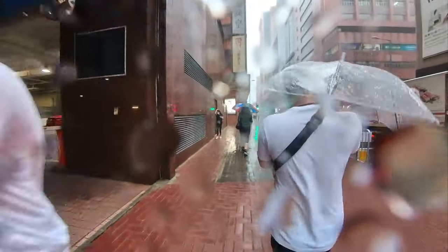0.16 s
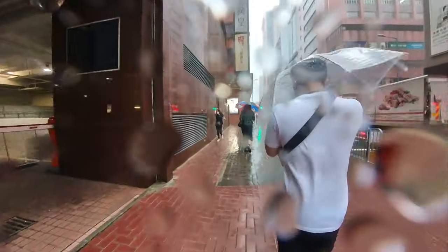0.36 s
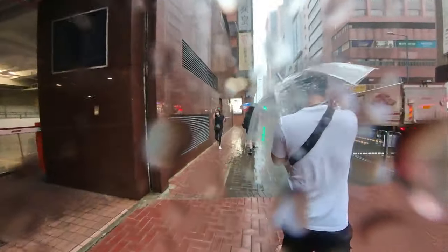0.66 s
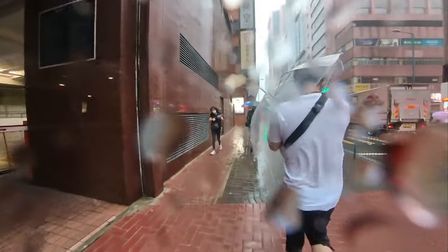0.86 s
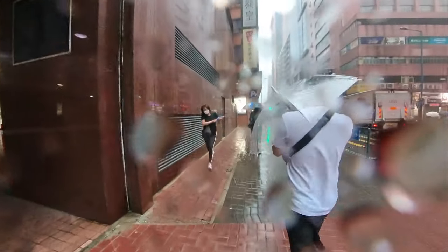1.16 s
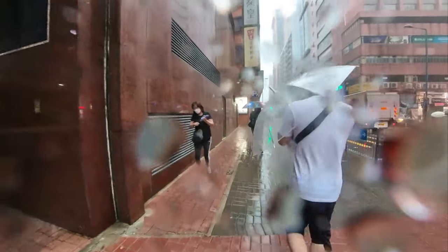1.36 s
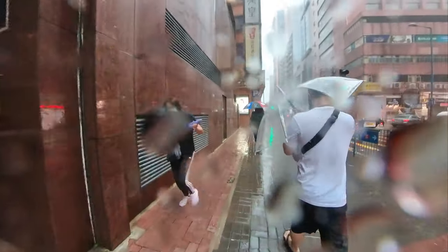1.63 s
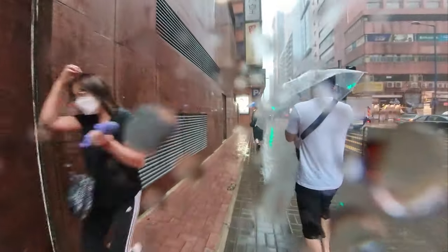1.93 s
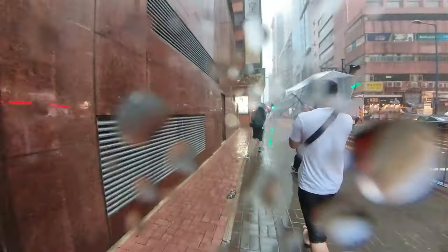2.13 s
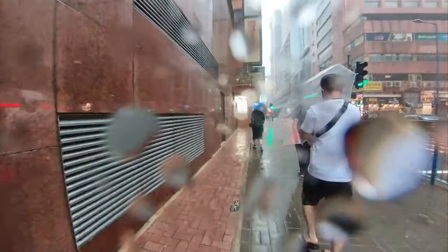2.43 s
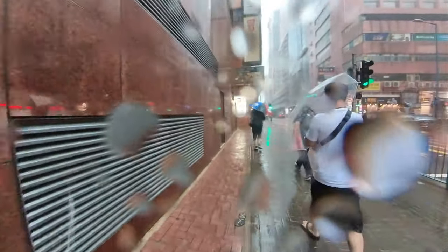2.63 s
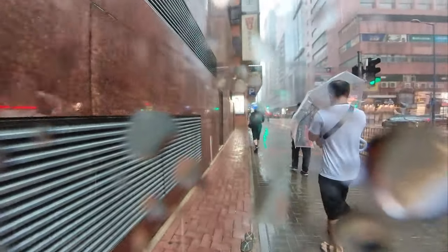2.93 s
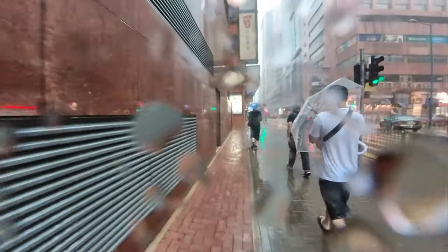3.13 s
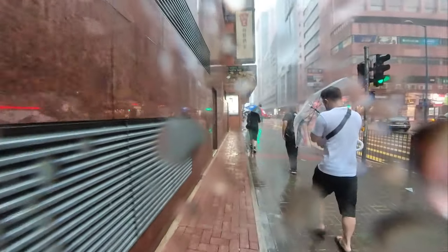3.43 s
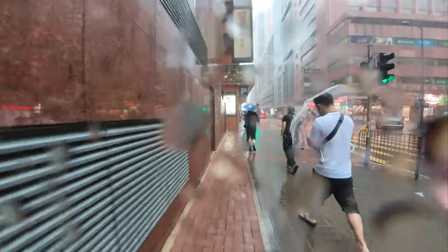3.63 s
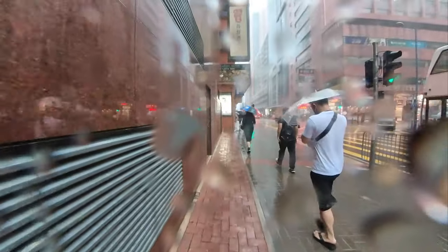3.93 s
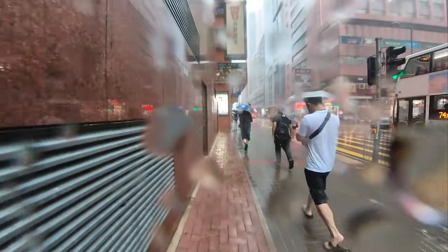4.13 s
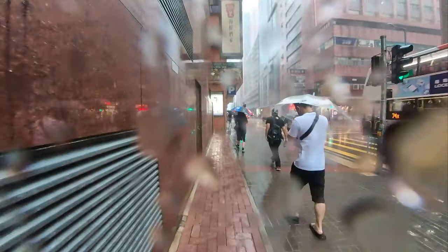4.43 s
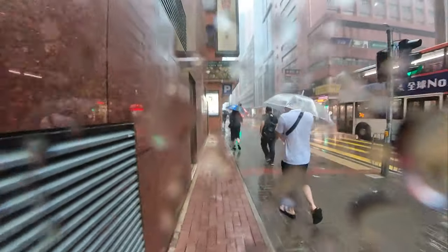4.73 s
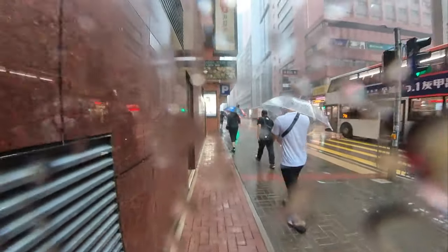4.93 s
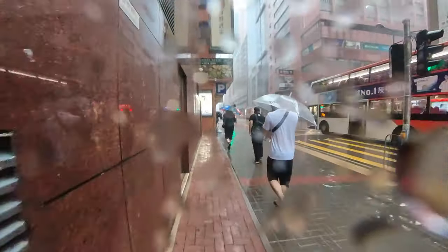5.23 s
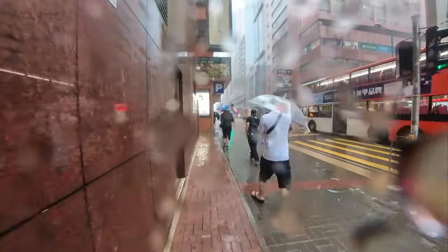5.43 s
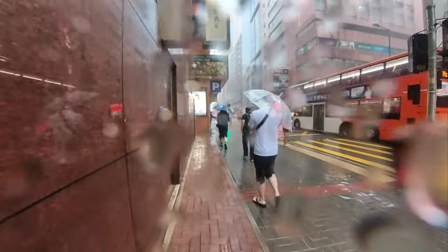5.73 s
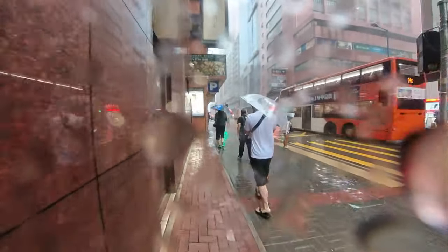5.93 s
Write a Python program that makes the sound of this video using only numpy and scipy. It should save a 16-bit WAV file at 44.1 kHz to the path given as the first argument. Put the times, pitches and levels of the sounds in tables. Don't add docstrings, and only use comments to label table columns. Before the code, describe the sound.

From 0 to about 2 seconds, rain on a covered passage roof makes a dull, hollow, surging roar, strongest near 0.8, fading as the walker leaves. Steady rain hiss lies over it, gently wide, its treble muffled by a wet sealed housing and slowly pressed down by noise suppression. Deep short pole thumps come at 0.6, 1.7, 2.0 and 2.5; drops tap the shell at 1.1 and 1.9, with a little watery rattle. At 2.76 a hard drop cracks sharply, with a knock and brief fizzing spray, then low sways and wind lumps around 2.9 to 3.3. Thuds and hollow mount knocks cluster at 3.2, 4.3 and 4.9, with the strongest knock at 5.43. A faint tick and spray come at 5.9, and a last bass thump at 6. Distant traffic rumbles softly throughout.

```python
import sys
import numpy as np
from scipy import signal
from scipy.fft import rfft, irfft, next_fast_len
from scipy.io import wavfile
from scipy.ndimage import uniform_filter1d

SR = 44100
rng = np.random.default_rng(int(sys.argv[2]) if len(sys.argv) > 2 else 0)


def field_ratio(decibels):
    return 10 ** (np.asarray(decibels, dtype=float) / 20)


def generate_wav(signal):
    frames = np.transpose(np.atleast_2d(signal))
    scaled = np.clip(frames, -1, 1) * 32767
    pcm = np.round(scaled).astype(np.int16)
    wavfile.write(sys.argv[1], SR, pcm)


N = 268172


def rms_one(x):
    return x / np.sqrt(np.mean(x ** 2) + 1e-20)


def drift(rate_hz):
    r = np.exp(-80 * np.pi * rate_hz / SR)
    noise = rng.standard_normal(N // 40 + 2002)
    slow = signal.lfilter([1], [1, -2 * r, r * r], noise)[2000:]
    return np.interp(np.arange(N) / 40, np.arange(len(slow)), rms_one(slow))


def bumps(rows):
    t = np.arange(N) / SR
    return sum(db * np.exp(-((t - s) / length) ** 2) for s, db, length in rows)


def coloured(x, points, low_hz, high_hz):
    size = next_fast_len(N)
    hz = np.maximum(np.arange(size // 2 + 1) * SR / size, 1)
    point_hz, point_db = np.array(points).T
    gain = field_ratio(np.interp(np.log(hz), np.log(point_hz), point_db))
    inside = (hz >= low_hz) * (hz < high_hz)
    return irfft(rfft(x, size) * gain * inside, size)[..., :N]


def band_of(x, low_hz, high_hz):
    return coloured(x, [(1, 0), (SR, 0)], low_hz, high_hz)


def ring(clicks, hz, t60_s):
    r = field_ratio(-60 / (t60_s * SR))
    w = 2 * np.pi * hz / SR
    return signal.lfilter([0, np.sin(w)], [1, -2 * r * np.cos(w), r * r], clicks + 1e-18)


def split(rows, rise_share):
    return [(s, db, hz, ms * rise_share, ms * (1 - rise_share)) for s, db, hz, ms in rows]


def swings(rows, sag, rough):
    out = np.zeros(N)
    flutter = np.array([drift(120.0), drift(240.0)])
    for s, db, hz, rise_ms, fall_ms in rows:
        first = max(round((s - rise_ms / 200) * SR), 0)
        last = min(round((s + fall_ms / 200) * SR), N)
        at = np.arange(first, last)
        t = at / SR - s
        age = 1000 * t / np.where(t < 0, rise_ms, fall_ms)
        turn = 2 * np.pi * hz * t * (1 - sag * np.tanh(age / 1.3))
        swing = (1 - rough + rough * flutter[0, at]) * np.sin(turn)
        swing += rough * flutter[1, at] * np.cos(turn)
        out[at] += field_ratio(db) * .5 ** (np.abs(age) ** 1.66) * swing
    return out


# pitch_hz, level_db (per Hz)
STREET_COLOUR = [(12, -33), (20, 3), (56, -1.5), (74, -0.5), (101, -9.5), (140, -11), (272, -12.5),
                 (315, -13.5), (357, -17.5), (390, -17), (682, -23), (1480, -32.5), (1920, -56.5),
                 (3260, -120)]
# peak_s, rise_db, length_s
GUST_TIMES = [(0.0, 4, 0.13), (.9, 3, 0.27), (2.2, 6, .08), (2.88, 12.5, 0.1), (3.277, 12, .13),
              (4.62, 4, 0.14), (5.06, 7, .1), (5.32, 4, 0.054), (5.85, 3.5, 0.37)]


def street():
    traffic_noise, wind_noise = rng.standard_normal((2, N))
    wind_db = -55 + bumps(GUST_TIMES) + 1.7 * drift(13.0)
    traffic_db = -57 + 0.67 * drift(5.3)
    wind = field_ratio(wind_db) * rms_one(coloured(wind_noise, STREET_COLOUR, 22, 130))
    traffic = field_ratio(traffic_db) * rms_one(coloured(traffic_noise, STREET_COLOUR, 120, 1500))
    return wind + traffic


# pitch_hz, level_db (per Hz)
HOLLOW_COLOUR = [(235, -18.5), (270, -7), (310, 5), (360, -0.5), (420, -2), (475, -9), (530, -16.5),
                 (600, -12.5)]
# peak_s, rise_db, length_s
ROOF_SURGES = [(.38, 2.5, 0.086), (.8, 6.5, 0.11), (1.15, 4.5, 0.036), (1.32, 2.5, 0.082), (1.53, 4, 0.033),
               (1.69, 5, 0.04), (1.85, 4.5, .04)]
# peak_s, rise_db, length_s
ROAR_SWELLS = [(.45, 5, 0.24), (.9, 5, 0.13), (1.25, 4.5, .12)]


def passage():
    t = np.arange(N) / SR
    fade_db = 9 * t
    low_db = -45.5 - fade_db + bumps(ROOF_SURGES) + 1.1 * drift(5.2)
    upper_db = -62.5 - 0.9 * fade_db + bumps(ROAR_SWELLS) + 1.6 * drift(3.9)
    gone_db = -20.0 * np.maximum(t - 2, 0)
    white = rng.standard_normal(N)
    low = field_ratio(low_db) * rms_one(coloured(white, HOLLOW_COLOUR, 235, 600))
    upper_colour = [(600, -0.5), (680, 0.5), (765, -4.5)]
    upper = field_ratio(upper_db) * rms_one(coloured(white, upper_colour, 600, 765))
    return field_ratio(gone_db) * (low + upper)


# low_hz, high_hz, narrow_share (of frames)
WIDE_BANDS = [(3050, 3400, .06), (3400, 3820, .04), (3820, 4300, .04), (4300, 5000, .04), (5000, 5600, .12),
              (5600, 6200, .4), (6200, 6850, .975), (8300, 9000, .98)]
NARROW_TIMES = [2.765, 5.885]


def width():
    frame = 1024
    out, white, t = 0, rng.standard_normal(N), np.arange(N) / SR
    for low_hz, high_hz, narrow_share in WIDE_BANDS:
        kept = np.repeat(rng.random(N // frame + 2) > narrow_share, frame) * 1.
        smooth = uniform_filter1d(kept, size=256)[:N]
        out = out + band_of(white * smooth, low_hz, high_hz)
    for s in NARROW_TIMES:
        out = out * (1 - np.exp(-((t - s) / .016) ** 4))
    return out


# pitch_hz, level_db (per Hz)
HISS_COLOUR = [(1500, 3), (2400, -2), (3800, -6), (4800, -6), (5500, -4), (6050, -8), (7000, -10.5),
               (7600, -17), (7750, -23), (8400, -30.5), (9000, -30), (9600, -44)]
HISS_EDGES_HZ = [1500, 2410, 3820, 6050, 9600]
# open_db, closes_db, closing_s, abruptness (no unit)
CLOSING = [(-58, 19.5, 6.56, 2.85), (-55.5, 3.5, 4.5, 1), (-60, 13, 1.22, 1.2), (-62, 18, 4.06, 2)]
WAVER_DB = [0.89, 0.87, 1.5, 0.47]
LIFTS = [.05, .05, .3, .1]
# start_s, end_s, rise_db
OPENING = (2.86, 3.05, 3.4)


def rain(grain_db, ragged_db, side_db):
    mid, side, t = rng.standard_normal(N), field_ratio(side_db) * width(), np.arange(N) / SR
    for low_hz in np.arange(7700, 9600, 200):
        patch_db = ragged_db * (low_hz - 7400) / 2000 * drift(18.0)
        mid = mid + (field_ratio(patch_db) - 1) * band_of(mid, low_hz, low_hz + 200)
    left_right = np.array([mid + side, mid - side])
    start_s, end_s, rise_db = OPENING
    opening_db = rise_db * uniform_filter1d(1. * (t > start_s) * (t < end_s), size=1800)
    shared, surge_db, out = drift(1.8), bumps(ROOF_SURGES), 0
    bands = zip(HISS_EDGES_HZ, HISS_EDGES_HZ[1:], CLOSING, WAVER_DB, LIFTS)
    for low_hz, high_hz, closing, waver_db, lift in bands:
        open_db, closes_db, closing_s, abruptness = closing
        closed = 1 - np.exp(-(t / closing_s) ** abruptness)
        level_db = open_db - closes_db * closed + lift * surge_db + opening_db
        level_db += waver_db * (0.66 * shared + drift(15.0))
        level_db += grain_db * (low_hz / 6000) ** 2 * drift(90.0)
        out = out + field_ratio(level_db) * rms_one(coloured(left_right, HISS_COLOUR, low_hz, high_hz))
    return out


# peak_s, level_db, pitch_hz, length_ms (at half height)
SHELL_TAPS = [(.735, -51, 4200, 3.5), (1.085, -39, 1360, 3.2), (1.098, -42, 1325, 5.3),
              (1.108, -49, 1354, 9), (1.095, -36.5, 257, 5), (1.897, -34.5, 513, 6.9),
              (1.895, -54, 1010, 4), (2.342, -52, 1020, 5.6), (2.511, -47, 1250, 3.5),
              (2.692, -39, 300, 3.1), (2.755, -33, 272, 5), (2.757, -43, 575, 2.8),
              (2.7795, -27, 272, 13.5), (2.7641, -27.5, 1040, 2.5), (2.7635, -45, 1800, 1.6),
              (2.78, -40, 553, 11), (2.842, -52, 694, 3.5), (2.778, -37.5, 1150, 4.5), (3.328, -43, 287, 7),
              (3.342, -47, 1045, 5), (3.731, -34.5, 262, 5.2), (4.051, -45.5, 1070, 4.6),
              (5.102, -54.5, 990, 4.8), (5.433, -32, 217, 3.9), (5.85, -52, 1340, 5.3),
              (5.9, -42, 5480, 2.2), (5.899, -41, 2730, 1.4), (5.901, -53.5, 1410, 5.5)]
# peak_s, level_db, pitch_hz, length_ms (at half height)
SHELL_TRICKLES = [(1.1, -51, 1347, 38), (1.135, -63, 1410, 18), (1.925, -47.5, 548, 42),
                  (2.8, -53, 1060, 61), (2.819, -43, 284, 32), (2.805, -67, 633, 40), (3.14, -61, 1050, 16),
                  (4.076, -54, 980, 13), (4.37, -55.5, 1123, 25), (4.405, -57.5, 1036, 26),
                  (5.875, -62, 1227, 57)]


def drops():
    taps = swings(split(SHELL_TAPS, 0.32), sag=.01, rough=0.14)
    trickles = swings(split(SHELL_TRICKLES, 0.55), sag=.0, rough=0.66)
    return taps + trickles


# start_s, level_db, spray_db, spray_length_s
SHARP_DROPS = [
    (0.716, -61, -57, 0.0096),
    (2.509, -50, -53, 0.0053),
    (2.763, -26, -54.5, 0.047),
    (5.898, -61, -64.5, 0.037),
]
# pitch_hz, level_db, t60_s
COVER_TONES = [(1210, 0.5, 0.0042), (2400, -27.5, 0.0031), (5480, -1, 0.0063), (4100, -2.5, 0.0027),
               (6260, -5.5, 0.0044)]
# pitch_hz, level_db (per Hz)
FIZZ_COLOUR = [(900, 3), (3000, -13.5), (6000, -2.5), (8000, -16), (9480, -39)]


def cracks():
    clicks, spray, t = np.zeros(N), np.zeros(N), np.arange(N) / SR
    for s, db, spray_db, length_s in SHARP_DROPS:
        clicks[round(s * SR)] = -field_ratio(db)
        age = np.clip((t - s) / length_s - .2, 0, 9)
        spray += field_ratio(spray_db) * np.tanh(18.0 * age) * np.exp(-(age / 0.94) ** 3.1)
    fizz = rms_one(coloured(rng.standard_normal(N), FIZZ_COLOUR, 840, 9480))
    ringing = sum(field_ratio(db) * ring(clicks, hz, t60_s) for hz, db, t60_s in COVER_TONES)
    return ringing + spray * fizz


# peak_s, level_db, pitch_hz, length_ms (at half height)
STEPS = [(0.629, -18, 41, 41), (1.685, -19, 41.6, 30), (1.961, -23, 33.6, 26), (2.5, -23, 38.2, 31),
         (3.174, -33, 46.1, 18), (3.355, -22.5, 42, 16.3), (3.748, -21, 43.4, 20),
         (4.112, -20.5, 32.8, 25.5), (4.267, -23, 40.6, 22), (4.401, -30.5, 37, 53), (4.919, -20, 42.8, 33),
         (5.124, -22.5, 40.3, 25), (5.189, -29.5, 33.5, 44), (5.444, -33, 53, 39), (5.508, -24, 34.2, 35),
         (5.653, -23, 35, 21.2), (6.029, -22, 43, 47)]
# peak_s, level_db, pitch_hz
SHAKES = [(.595, -23.5, 44.3), (0.627, -34, 63.3), (1.115, -41, 40.2), (1.419, -39.5, 55), (1.6, -49, 89.5),
          (1.676, -31.5, 86.5), (2.329, -42.5, 40.6), (2.81, -33, 40), (3.215, -31.5, 29.8),
          (4.066, -33.5, 38.7), (4.889, -30.5, 39.6), (4.916, -39.5, 75), (5.745, -31.5, 30),
          (5.991, -29.5, 35)]
# peak_s, level_db, pitch_hz
SWAYS = [
    (2.923, -25.5, 49.6),
    (3.008, -26.5, 48),
]
# peak_s, level_db, pitch_hz, fall_ms
MOUNT_KNOCKS = [(0.624, -35, 77.7, 48), (1.096, -30, 116.4, 10), (1.629, -37.5, 98, 15),
                (2.702, -33, 52.8, 44), (2.7792, -25, 130, 11), (3.163, -29, 101, 13),
                (3.173, -23.5, 99, 15.4), (3.212, -36.5, 94, 7.5), (3.256, -27, 103.5, 21),
                (3.326, -39.5, 100, 6.3), (3.732, -34.5, 96, 5.5), (4.258, -25, 103.3, 23),
                (4.363, -32, 107, 4.9), (4.902, -42.5, 106.6, 7.4), (5.434, -16.5, 94, 7.8),
                (5.464, -32, 96.7, 2.9)]


def pole():
    rows = split(STEPS, 0.46)
    rebounds = [(s + 0.0395, db - 15, 37) for s, db, *_ in STEPS]
    rows += [(s, db, hz, 12, 15) for s, db, hz in list(SHAKES) + rebounds]
    rows += [(s, db, hz, 35.4, 35.4) for s, db, hz in SWAYS]
    for s, db, hz, fall_ms in MOUNT_KNOCKS:
        rise_ms = max(4.76 - 0.05 * (db + 30), 1)
        rows.append((s, db, hz, rise_ms, fall_ms))
    return swings(rows, sag=0.07, rough=0.032)


def scene():
    shell = pole() + drops() + cracks()
    hiss = rain(grain_db=0.5, ragged_db=7.0, side_db=-4.5)
    return shell + street() + passage() + hiss


def roll_off(x):
    return signal.sosfilt(signal.butter(12, 9510, fs=SR, output="sos"), x)


def record(dry):
    wet_port = signal.cheby2(8, 40, 9900, fs=SR, output="sos")
    dull = signal.sosfilt(wet_port, dry)
    return roll_off(dull)


dry = scene()
out = record(dry)
generate_wav(out)
```